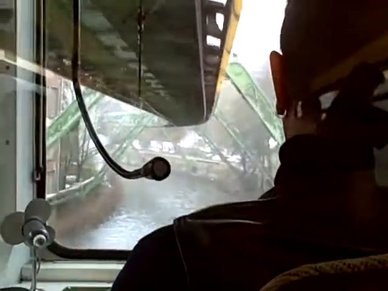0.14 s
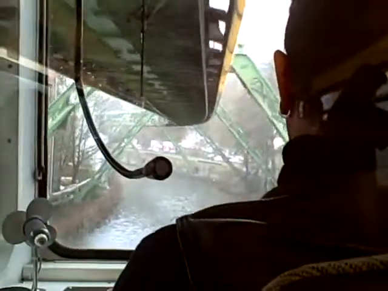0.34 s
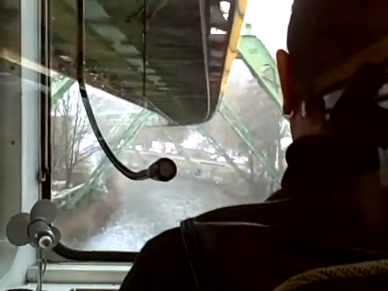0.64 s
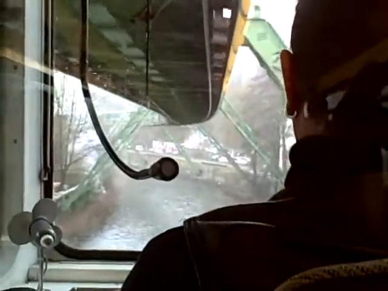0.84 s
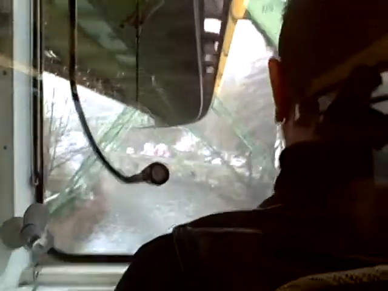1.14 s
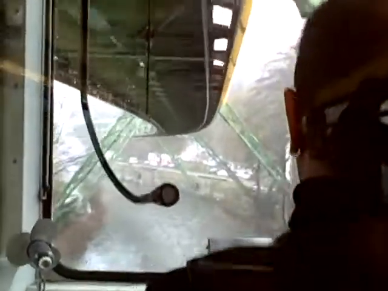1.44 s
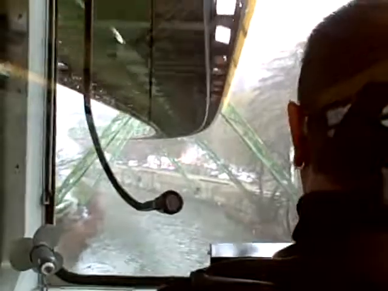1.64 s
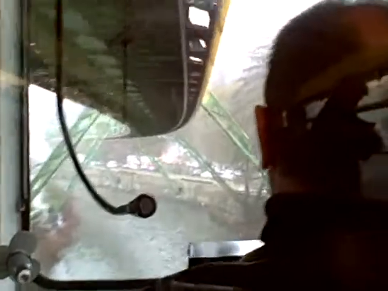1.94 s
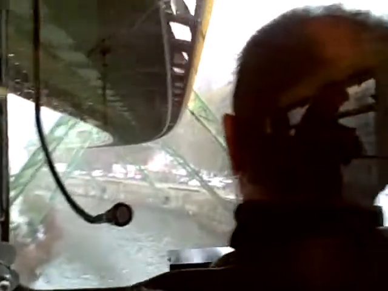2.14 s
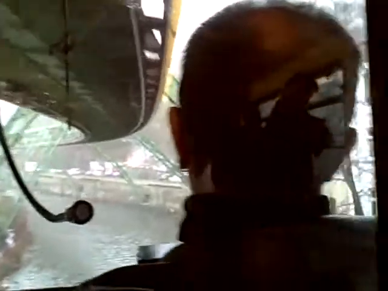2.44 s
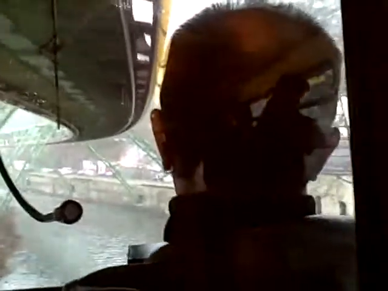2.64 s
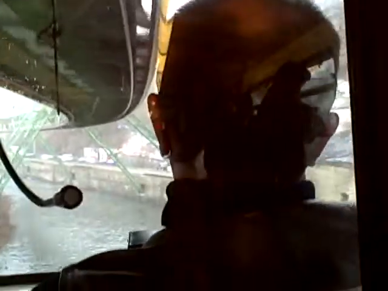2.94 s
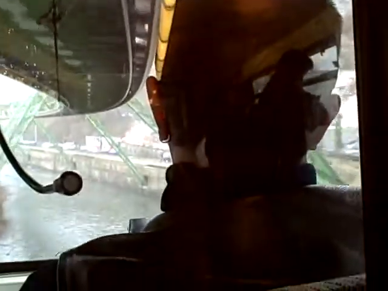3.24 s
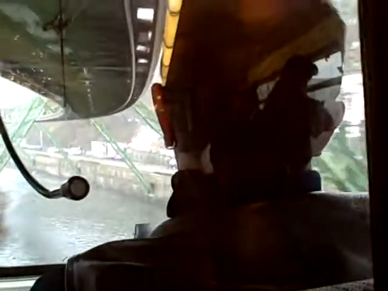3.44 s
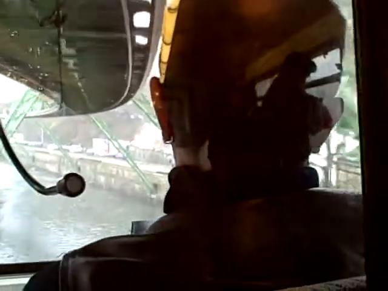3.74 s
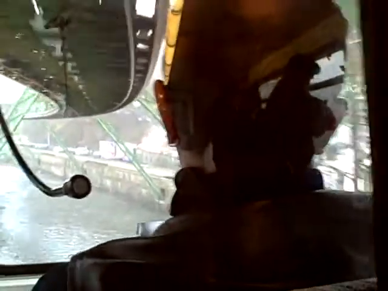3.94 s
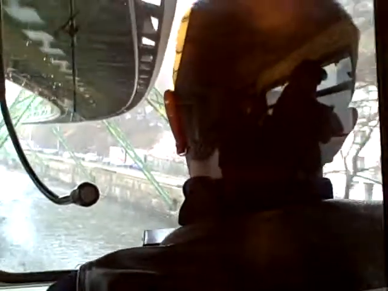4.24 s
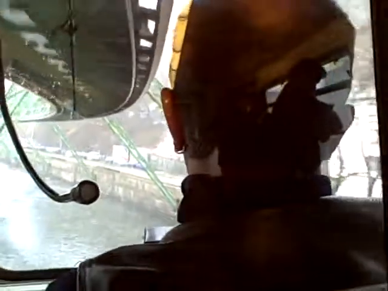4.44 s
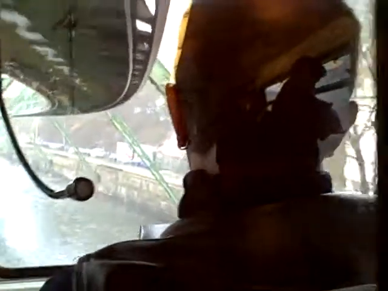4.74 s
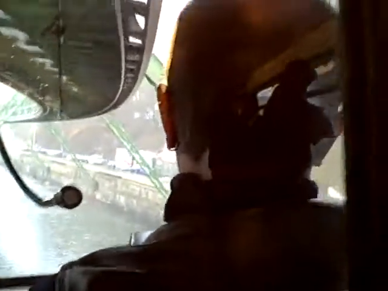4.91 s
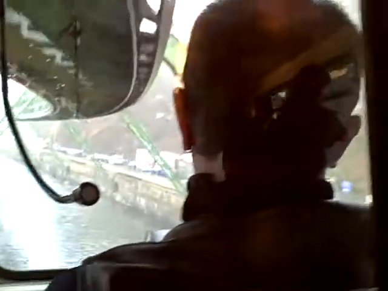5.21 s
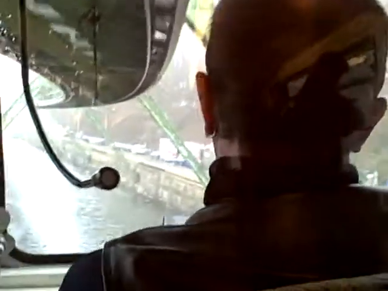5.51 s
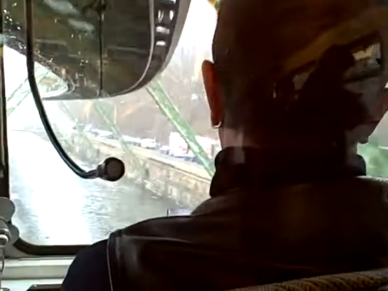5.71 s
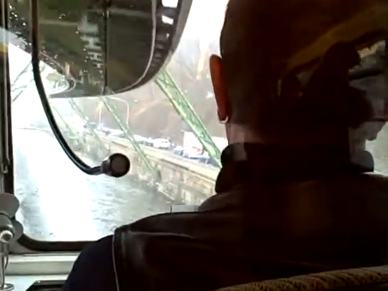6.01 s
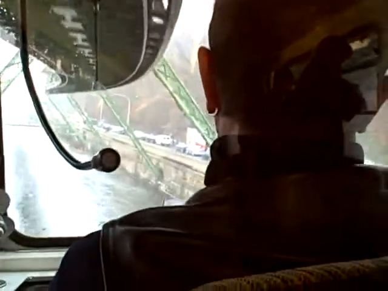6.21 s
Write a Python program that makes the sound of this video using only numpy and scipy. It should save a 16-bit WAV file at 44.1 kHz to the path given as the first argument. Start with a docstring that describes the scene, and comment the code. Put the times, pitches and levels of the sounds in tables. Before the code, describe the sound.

A close, boxy cab interior: very low wheel shudder dominates, roughened by clipped peaks. Quick rhythmic drumming and floor boom rise and fall, with thin metallic buzzes in the treble. Small clicks, dry knocks and brief faint squeaks come irregularly, thickest around the middle. The wheels speed up very slightly; later the buzz and drum thin out, leaving heavy rumble.

```python
"""Slightly out-of-round wheels shake the cab of a suspended railway car as it rolls along its overhead steel
rail. The shaking comes at multiples of the wheels' turning rate. A rippled stretch of one tread drums once a
turn, with a booming floor panel and buzzing loose fittings. Rolling noise, jolts, ticks, squeaks and a faint
whine join in. The rumble overloads a small microphone, which cuts its peaks flat, so it breaks off sharply
where the jolts drive it hardest."""
import sys
import numpy as np
from scipy import signal
from scipy.fft import rfft, irfft, next_fast_len
from scipy.io import wavfile
from scipy.ndimage import uniform_filter1d

SR = 44100
rng = np.random.default_rng(int(sys.argv[2]) if len(sys.argv) > 2 else 0)


def generate_wav(signal):
    """Clip the signal to [-1, 1] and save it as 16-bit WAV at the path in sys.argv[1]."""
    frames = np.transpose(np.atleast_2d(signal))
    scaled = np.clip(frames, -1, 1) * 32767
    pcm = np.round(scaled).astype(np.int16)
    wavfile.write(sys.argv[1], SR, pcm)


N = 280917

# treble colour of the microphone, strongest near 6 kHz and dropping steeply by 9 kHz: (f/Hz, gain/dB)
MIC = [(4000, 4), (5000, 7.5), (6200, 13), (7350, 9.5), (7900, -0.5), (8500, -2), (9000, -26)]
# levels of the drumming tread and of the floor panel: (t/s, drum level/dB, panel level/dB)
DRUMMING = [(0, -18.5, -33), (.13, -21.5, -23.5), (.32, -15, -22.5), (.52, -17.5, -21.5),
            (.73, -18.5, -25.5), (.92, -20.5, -25), (1.101, -23.5, -25), (1.299, -21, -24.5),
            (1.5, -18, -30), (1.7, -22.5, -22), (1.9, -23, -24.5), (2.05, -27, -21), (2.24, -17, -20.5),
            (2.45, -19, -21), (2.62, -20, -24.5), (2.8, -21, -30), (3.15, -24, -25), (3.55, -24, -23.5),
            (3.899, -19.5, -20.5), (4.1, -22, -17), (4.3, -19.5, -21), (4.47, -23.5, -23.5),
            (4.65, -29, -21.5), (4.83, -25.5, -21.5), (5.02, -29, -17), (5.2, -32.5, -28.5),
            (5.6, -38.5, -27.5), (5.999, -29.5, -33), (6.37, -35, -36)]
# where in each turn the drum sounds: (peak/turns, length/turns, floor under the hump/dB)
DRUM_GATE = (.71, .8, -16)
LOBE_WAVER_DB = 2


def undb(db):
    """Turn decibels into a gain."""
    return 10 ** (np.asarray(db) / 20)


def curve(s, values):
    """Join points by straight lines in time."""
    return np.interp(np.arange(N) / SR, s, values)


def colour(x, points):
    """Filter by (f/Hz, gain/dB) points joined on a log-frequency axis."""
    size = next_fast_len(N)
    hz, db = np.transpose(points)
    bins = np.maximum(np.arange(size // 2 + 1) * SR / size, 1)
    gain = undb(np.interp(np.log(bins), np.log(hz), db))
    return irfft(rfft(x, size) * gain, size)[:N]


def resonate(x, hz, width_hz):
    """Ring at one pitch: a two-pole resonance with gain 1 at its centre."""
    return signal.lfilter(*signal.iirpeak(hz, hz / width_hz, fs=SR), x)


def unit(x):
    """Scale to an rms of 1."""
    return x / np.sqrt(np.mean(x ** 2))


def walk(rate):
    """Wander at random: values held for 1 / rate seconds, smoothed twice, with an rms of 1."""
    k = int(SR / rate)
    held = np.repeat(rng.standard_normal(N // k + 1), k)
    smooth = uniform_filter1d(uniform_filter1d(held, k), k)
    return unit(smooth[:N])


def swells(table, blunt=0.79):
    """Humps of level, flatter on top and steeper at the ends as blunt falls; powers add where they overlap."""
    t, power = np.arange(N) / SR, 0
    for s, db, length in table:
        hump = np.abs(np.cos(np.pi * np.clip((t - s) / length, -.5, .5)))
        inside = hump > 1e-9
        power = power + (undb(db) * hump ** blunt * inside) ** 2
    return np.sqrt(power)


def once_a_turn(turn, gate):
    """A hump of level at the same place in every turn, scaled to a mean power of 1."""
    blunt = 0.84  # below 1 the humps are flatter on top
    peak, share, floor_db = gate
    off = ((turn - peak + .5) % 1 - .5) / share
    hump = np.abs(np.cos(np.pi * np.clip(off, -.5, .5))) ** blunt
    return unit(np.hypot(hump, undb(floor_db)))


def whine():
    """Thin tones whose pitch barely wavers."""
    # steady tones: (f/Hz, rms level/dB)
    tones = [(4844, -71.5), (7490, -71), (7731, -77)]
    out = 0
    for hz, db in tones:
        pitch = hz + 4 * walk(2.9)
        out = out + np.sqrt(2) * undb(db) * np.sin(2 * np.pi * np.cumsum(pitch) / SR)
    return out


def rolling():
    """Rail roughness through the car body: wide noise bands that swell together and flicker alone."""
    # noise levels: (t/s, level/dB, extra below 45 Hz/dB, extra from 45 to 130 Hz/dB, extra above 3500 Hz/dB)
    roll_levels = [(0, -31.5, -0.5, 0, 2.5), (0.599, -33, -1, 0, 1), (1.2, -33, -1.5, 1.5, -2),
                   (1.8, -34, -3, -2, 0.5), (2.1, -32.5, -3, -4, 1), (2.395, -33.5, -7, -3.5, 0.5),
                   (2.999, -33.5, 2.5, 1, 0), (3.601, -29.5, 0, 0, -1), (4.201, -31.5, -1, -2, 0),
                   (4.8, -32.5, 0, 1.5, -0.5), (5.402, -34, -6.5, -1, -1.5), (5.9, -34, -6.5, -3.5, -1.5),
                   (6.37, -33, -2.5, -2.5, -2)]
    # colour of the rolling noise and air in the cab: (f/Hz, gain/dB)
    cab_colour = [(3, 27), (10, 39.5), (20, 28.5), (38, 40.5), (55, 32.5), (80, 26.5), (100, 28), (118, 25),
                  (140, 16.5), (200, 9), (346, -1.5), (602, -8.5), (900, -11), (1150, -17.5), (1900, -21),
                  (4300, -23)]
    s, db, deep_db, bass_db, treble_db = np.transpose(roll_levels)
    extras_db = {1: curve(s, deep_db), 45: curve(s, bass_db), 3500: curve(s, treble_db)}
    edges_hz = [1, 45, 130, 400, 1200, 3500, 10000]
    out, shared = 0, walk(6.4)
    for lo, hi in zip(edges_hz, edges_hz[1:]):
        band_pass = signal.butter(2, [lo, hi], "band", fs=SR, output="sos")
        band = signal.sosfilt(band_pass, rng.standard_normal(N))
        out = out + band * undb(0.36 * shared + 1.2 * walk(13) + extras_db.get(lo, 0))
    return colour(undb(curve(s, db)) * colour(out, cab_colour), MIC)


def squeaks():
    """Short, faint, unsteady tones that slide in pitch."""
    # squeaks: (t of peak/s, level/dB, length/s, f at peak/Hz, glide/Hz per s)
    slides = [(2.08, -56, .06, 6070, -3), (2.13, -55, .07, 6010, 301), (2.198, -66, 0.3, 4190, 98),
              (2.89, -55, .1, 5560, -3000), (6.09, -63, .07, 5030, -7000)]
    t, out = np.arange(N) / SR, 0
    for s, db, length, hz, glide in slides:
        pitch = hz + glide * np.clip(t - s, -length, length) + 20 * walk(40)
        out = out + swells([(s, db, length)]) * np.sin(2 * np.pi * np.cumsum(pitch) / SR)
    return np.sqrt(2) * out * undb(2.5 * walk(70))


def ticks():
    """A small plastic part chatters for a few milliseconds: a scatter of fading taps rings its modes."""
    # chatters: (t/s, strength of the taps together/dB)
    chatters = [(1.074, -50), (1.2, -48), (1.443, -45.5), (2.002, -40.5), (2.254, -46), (2.288, -45),
                (3.484, -46), (3.543, -39.5), (3.628, -39.5), (3.7325, -42.5), (3.853, -47), (4.638, -41.5)]
    # ringing modes of the part: (f/Hz, relative level/dB, time to fade by 60 dB/s)
    modes = [(1590, 2.5, .018), (1950, -2, .007), (2400, -1, .009), (3000, -2, .006), (3690, -3, .007)]
    push, t = np.zeros(N), np.arange(int(0.053 * SR)) / SR
    for s, db in chatters:
        tap = rng.standard_normal(len(t)) * (rng.random(len(t)) < .08)
        tap = tap * np.exp(-t / 0.009)
        start = int(s * SR)
        push[start:start + len(t)] += undb(db) * tap / np.linalg.norm(tap)
    t, ring = np.arange(int(.1 * SR)) / SR, 0
    for hz, db, t60 in modes:
        ring = ring + undb(db) * np.sin(2 * np.pi * hz * t) * np.exp(-np.log(1000) * t / t60)
    return signal.fftconvolve(push, ring)[:N]


def jolts(rumble):
    """The car jolts: at each jolt the rumble surges for a moment and a short pulse goes with it, so the
    overloaded microphone flattens its peaks and the sound breaks off sharply there."""
    # jolts, each with a short pulse, brighter the shorter: (t/s, peak of the pulse/dB, time scale of the
    # pulse/ms)
    jolt_table = [(0.27, -28, 0.63), (0.339, -28.5, 0.6), (.523, -27, .8), (1.259, -28, 0.9), (2.099, -30.5, 1),
                  (2.219, -25, 1), (2.423, -23, 0.39), (2.635, -25.5, 0.72), (2.951, -30, .8),
                  (3.206, -31.5, 0.91), (3.341, -27.5, 0.14), (3.396, -25.5, 0.27), (3.429, -24.5, .35),
                  (3.687, -30.5, 0.27), (3.922, -24, .8), (3.981, -21, .6), (4.101, -24.5, .5),
                  (4.128, -27.5, .5), (4.509, -27, 0.52), (5.014, -25, 0.54), (5.228, -26, .55),
                  (5.244, -29.5, .5), (5.421, -30.5, 0.43)]
    surge_s, surge_from_db, surge_gain = .05, -31, .03  # gain is per dB above surge_from_db
    out, t, clock = np.zeros(N), np.arange(int(.03 * SR)) / SR, np.arange(N) / SR
    swing = np.sign(np.gradient(uniform_filter1d(rumble, size=88)))  # +1 rising, -1 falling
    for s, db, pulse_ms in jolt_table:
        x = t / (pulse_ms / 1000)
        pulse = np.sin(x) * np.exp(-x / 2)
        start = int(s * SR)
        # each pulse starts in the direction the rumble is swinging
        out[start:start + len(t)] += swing[start] * undb(db) * pulse / pulse.max()
        hump = np.cos(np.pi * np.clip((clock - s) / surge_s, -.5, .5)) ** 2
        out += surge_gain * max(db - surge_from_db, 0) * hump * rumble
    return out


def fittings(ripple):
    """Ripples throw loose fittings against their seats: dense uneven clicks, bunched once a ripple, ring them."""
    # resonances of the fittings: (f/Hz, width/Hz, relative level/dB)
    resonances = [(4620, 110, -10.5), (4930, 100, -5.5), (5380, 64, -2.5), (5895, 120, 0.5), (6310, 81, -4),
                  (6430, 71, -2.5), (6730, 76, -6.5), (6900, 94, -6), (7690, 220, -12), (2790, 6900, -8.5)]
    # short bursts of buzz: (t of peak/s, level/dB)
    bursts = [(.03, -52), (.19, -53.5), (0.379, -45), (0.581, -46), (.79, -50), (.97, -50), (1.07, -58.5),
              (1.36, -51.5), (1.54, -46), (1.73, -48.5), (1.94, -50.5), (2.12, -60), (2.288, -44),
              (2.49, -44.5), (2.669, -46), (2.866, -47.5), (2.98, -50), (3.179, -51.5), (3.38, -47.5),
              (3.53, -53.5), (3.75, -47.5), (3.87, -47.5), (3.98, -43.5), (4.1, -47.5), (4.29, -44.5),
              (4.49, -48), (4.63, -53), (4.96, -52.5), (5.37, -53)]
    burst_s, blunt = 0.14, 0.78
    bunch = np.clip(1 + .5 * np.cos(ripple + .5 * walk(23)), 0, None)
    sizes = undb(1.5 * rng.exponential(size=N)) * (rng.random(N) < .1)  # one sample in ten clicks
    clicks = bunch * sizes * rng.standard_normal(N)
    buzz = sum(undb(db) * resonate(clicks, hz, width) for hz, width, db in resonances)
    level = swells([(s, db, burst_s) for s, db in bursts], blunt)
    return level * unit(colour(buzz, MIC))


def panel(turn):
    """A floor panel booms after each drum beat, near one pitch that wavers at random."""
    # where in each turn the panel sounds: (peak/turns, length/turns, floor under the hump/dB)
    panel_gate = (0.874, 0.76, -6.5)
    s, _, db = np.transpose(DRUMMING)
    hz = 71.55 * (1 + .08 * walk(12))
    level = np.sqrt(2) * undb(curve(s, db) + 1.5 * walk(8)) * once_a_turn(turn, panel_gate)
    return level * np.sin(2 * np.pi * np.cumsum(hz) / SR)


def drum(turn, ripple):
    """The ripples hum while their stretch of tread carries the load, once a turn."""
    s, db, _ = np.transpose(DRUMMING)
    level = np.sqrt(2) * undb(curve(s, db) + 1.1 * walk(8)) * once_a_turn(turn, DRUM_GATE)
    return level * np.cos(ripple)


def three_cornered(turn):
    """The slightly three-cornered driven wheel heaves three times a turn; the ripples lie in a hollow."""
    angle = 2 * np.pi * (turn - DRUM_GATE[0])
    level = np.sqrt(2) * undb(-21 + LOBE_WAVER_DB * walk(3.018))
    return -level * np.cos(3 * angle + 0.24 * walk(2.7))


def lobes(turn):
    """Bumps around the wheel over the cab, called lobes, lift the car that many times a turn."""
    # lobes that hold their level: {bumps a turn: level/dB}
    steady_lobes = {7: -24.5, 13: -32.5, 14: -35}
    # lobes that swell and fade: (t/s, 4 bumps a turn/dB, 5 bumps a turn/dB, 6 bumps a turn/dB)
    strong_lobes = [(0, -10.5, -32, -11.5), (.1, -13, -26.5, -16), (.3, -21, -22.5, -15.5),
                    (.55, -29.5, -28.5, -14), (.85, -12, -30.5, -14.5), (1.0, -22.5, -29.5, -11.5),
                    (1.2, -10.5, -20, -13), (1.4, -13.5, -23, -16), (1.53, -19, -26.5, -14.5),
                    (1.75, -12.5, -23.5, -12.5), (2.0, -10.5, -17.5, -13), (2.3, -17.5, -18.5, -14),
                    (2.52, -28, -19.5, -15), (2.76, -12, -29.5, -15.5), (2.88, -16.5, -18, -15),
                    (3.12, -10, -17, -12), (3.351, -6, -20, -14), (3.7, -11.5, -20.5, -12),
                    (3.87, -14.5, -12, -14), (4.03, -7.5, -24, -13.5), (4.37, -8.5, -14, -19.5),
                    (4.62, -13.5, -25, -16), (4.81, -21.5, -16.5, -10.5), (4.97, -17.5, -16, -14),
                    (5.1, -16, -15, -22.5), (5.3, -7, -23, -16.5), (5.47, -6, -16.5, -20.5),
                    (5.67, -8, -31, -20), (5.9, -9.5, -25.5, -17.5), (6.03, -8.5, -30, -24),
                    (6.2, -8, -25.5, -18), (6.37, -11, -23.5, -28)]
    # bumps a turn of the lobes with a hollow where the others have a bump
    hollow_first = (7, 13, 14)
    first_turn = .835  # part of a turn already rolled at the start
    s, four_db, five_db, six_db = np.transpose(strong_lobes)
    levels = {**steady_lobes, 4: curve(s, four_db), 5: curve(s, five_db), 6: curve(s, six_db)}
    angle, out = 2 * np.pi * (turn + first_turn), 0
    for bumps, db in levels.items():
        level = np.sqrt(2) * undb(db + LOBE_WAVER_DB * walk(6))
        phase = np.pi * (bumps in hollow_first) + 0.22 * walk(2.7)
        out = out + level * np.cos(bumps * angle + phase)
    return out


def scene():
    """Roll both wheels, shake the car with them, then add the other sounds in the cab."""
    # wheel speeds: (t/s, driven wheel/turns per s, slightly smaller wheel over the cab/turns per s)
    wheel_speeds = [(0, 5.14, 5.198), (1.6, 5.285, 5.327), (3.2, 5.399, 5.434), (4.8, 5.482, 5.503),
                    (6.37, 5.534, 5.535)]
    ripples = 17  # around the whole tread
    drum_rise_hz = 4.58  # the hum climbs through each beat, this far either side of its pitch
    s, driven, over_cab = np.transpose(wheel_speeds)
    turn = np.cumsum(curve(s, driven)) / SR
    cab_turn = np.cumsum(curve(s, over_cab)) / SR
    # phase of the ripples, counted from the middle of the rippled stretch
    from_middle = turn - DRUM_GATE[0]
    ripple = 2 * np.pi * ripples * from_middle + .5 * walk(7)
    ripple = ripple - drum_rise_hz / curve(s, driven) * (np.cos(2 * np.pi * from_middle) - 1)
    car = lobes(cab_turn) + three_cornered(turn) + drum(turn, ripple) + panel(turn) + rolling()
    return (car + jolts(car) + fittings(ripple) + ticks() + squeaks() + whine())[None]


def record(dry):
    """The overloaded microphone cuts the peaks flat; a steep filter then removes the top treble."""
    overload, top_hz = .706, 10300
    flat = np.clip(dry, -overload, overload)
    top = signal.cheby2(10, 60, top_hz, fs=SR, output="sos")
    first = flat[:, :1]  # filtering around the first value avoids a jump at the start
    return signal.sosfilt(top, flat - first) + first


dry = scene()
out = record(dry)
generate_wav(out)
```